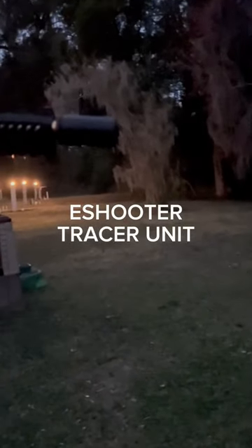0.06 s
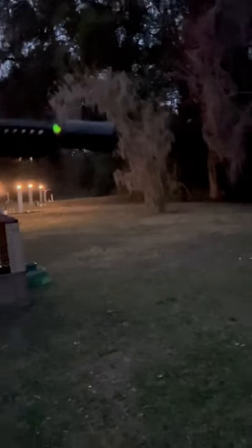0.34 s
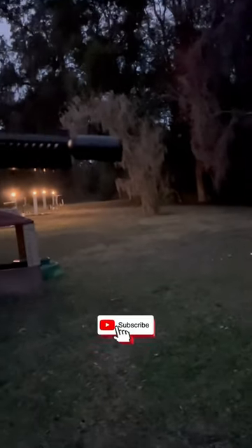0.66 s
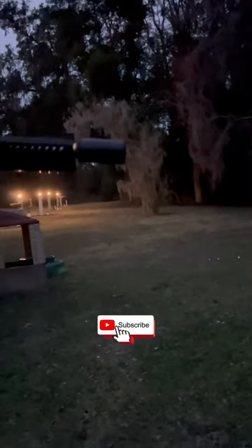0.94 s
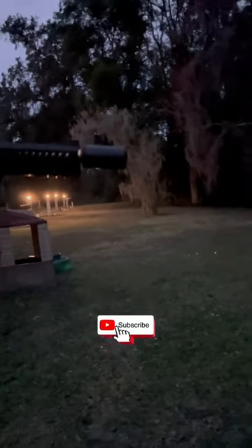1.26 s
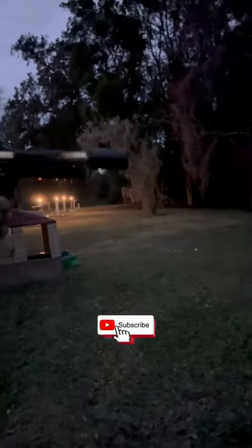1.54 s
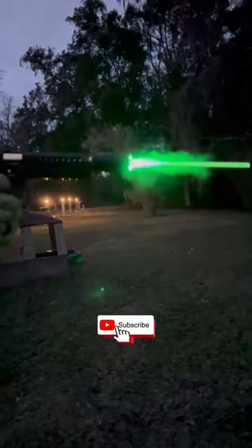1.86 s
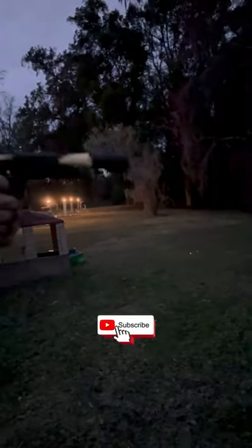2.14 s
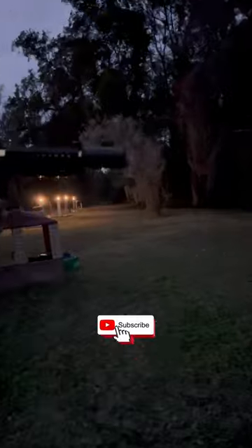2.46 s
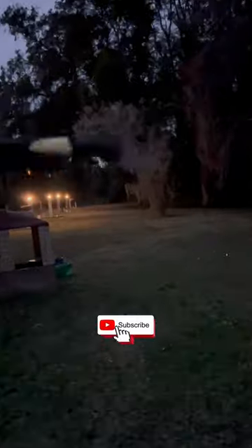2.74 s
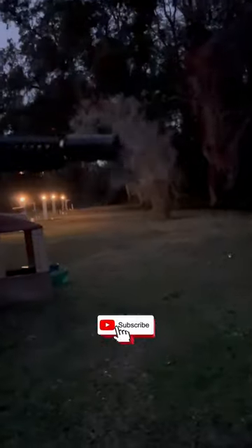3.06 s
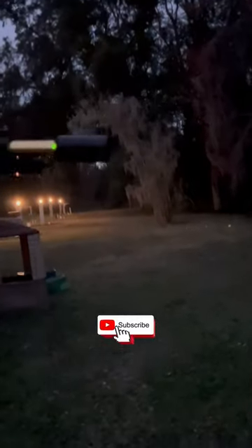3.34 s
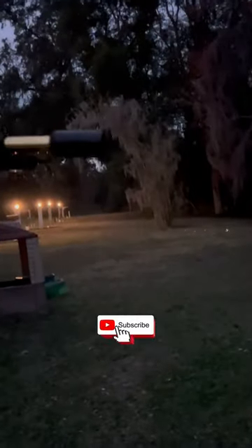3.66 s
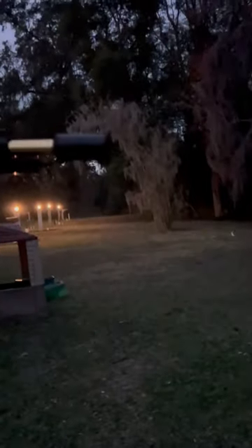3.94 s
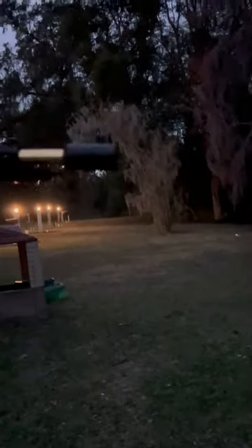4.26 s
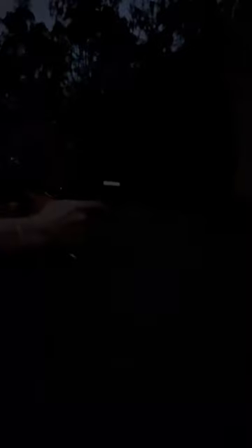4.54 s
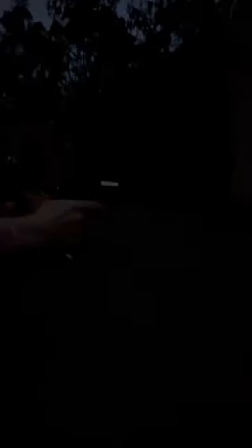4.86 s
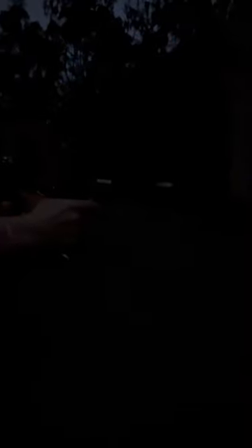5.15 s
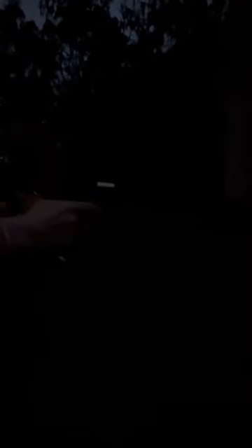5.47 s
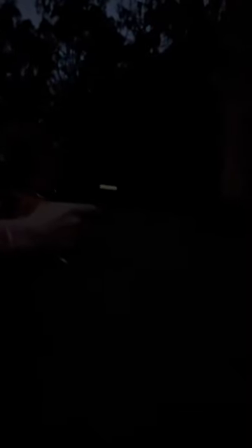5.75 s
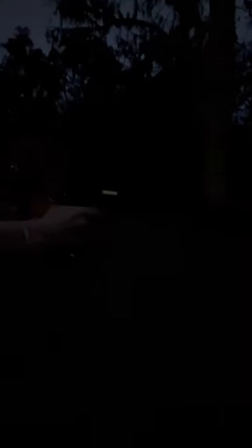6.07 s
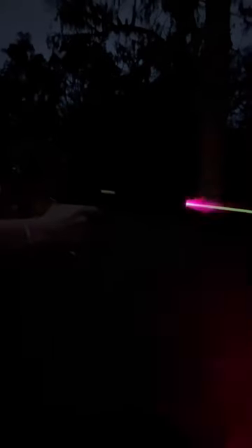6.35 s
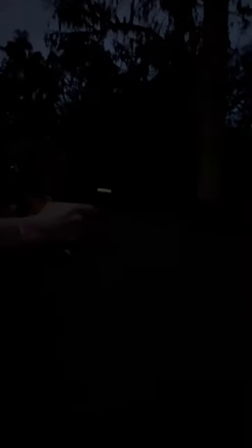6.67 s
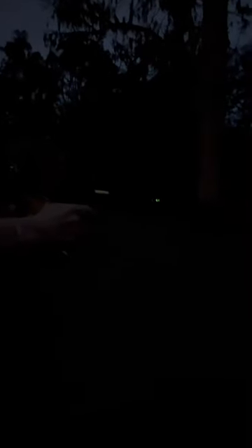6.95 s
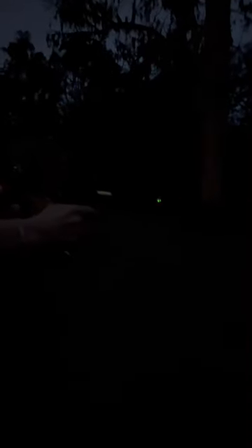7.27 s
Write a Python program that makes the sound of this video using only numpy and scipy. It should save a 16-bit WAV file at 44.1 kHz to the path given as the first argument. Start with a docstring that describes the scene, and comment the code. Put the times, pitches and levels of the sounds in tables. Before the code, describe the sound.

Outdoors, a close airsoft pistol cracks once, then fires ten quick shots, its slide snapping and rattling with each puff of gas. Two faint, dull knocks sound far off in the pause. A low, airy rush rises twice, with one shot between the swells, and three evenly spaced shots follow. Light trigger clicks, a short echo from trees and a faint pellet strike on a far target sit over a quiet background hum.

```python
"""Airsoft pistol on a lawn at dusk

A gas blowback pistol fires close to a stereo microphone: single shots and one fast string. Each shot is
a cycle: hammer, gas pop, slide at its rear stop, slide slamming shut, rebound. Trees scatter the cracks
back and pellets ring a distant target. Behind lie a faint insect and a low rush that swells twice."""
import sys
import numpy as np
from scipy import signal
from scipy.fft import rfft, irfft, next_fast_len
from scipy.io import wavfile
from scipy.ndimage import map_coordinates

SR = 44100
rng = np.random.default_rng(int(sys.argv[2]) if len(sys.argv) > 2 else 0)


def digitize_waveform(pressure):
    """Quantize a signal to 16-bit integers and store it at the path in sys.argv[1].

    Rows of a 2-D input are taken as channels; values are limited to [-1, 1].
    """
    field = np.atleast_2d(pressure).T
    bounded = np.clip(field, -1, 1)
    quanta = np.round(bounded * 32767).astype(np.int16)
    wavfile.write(sys.argv[1], SR, quanta)


N = 331191
T = np.arange(SR // 3) / SR  # seconds within one event

# Each row: hammer fall in seconds, seconds until the slide is shut, relative levels in dB of gas charge,
# thump, barrel ring and sear scrape, then 1 if the slide locks open on the empty magazine.
SHOT_CYCLES = [(0.2135, 0.063, 0.5, -26, -27, -24, 0), (1.269, 0.059, 0, -23.5, -29.5, -19, 0),
               (1.4706, 0.067, -0.16, -23.5, -31.5, -23, 0), (1.6718, 0.066, -2, -32.5, -30.5, -26.5, 0),
               (1.8783, 0.067, 0.86, -30.5, -36.5, -25.5, 0), (2.0764, 0.067, -0.5, -33, -35.5, -22, 0),
               (2.2743, 0.071, .5, -22.5, -37.5, -25, 0), (2.4909, 0.069, 1.35, -18, -38, -26, 0),
               (2.704, 0.07, 1.5, -33, -38.5, -28.5, 0), (2.9029, .0699, 0, -21.5, -40.5, -22.5, 0),
               (3.1224, 0.064, -1.5, -41, -46, -23.5, 1), (5.0462, 0.066, -4, -35.5, -36, -16.5, 0),
               (6.3081, 0.066, -3.5, -31.5, -39.5, -15, 0), (6.6871, 0.064, -2.5, -28.5, -39, -22.5, 0),
               (7.0638, 0.061, -2.5, -31.5, -37, -20.5, 0)]
# Trigger and handling ticks, then far knocks. Each row: start in seconds, relative level in dB.
HANDLING_TICKS = [(0.365, -34), (1.235, -56), (2.6046, -34), (3.3121, -50.5), (4.3297, -66),
                  (4.4963, -58.5), (4.9551, -57), (5.1903, -35), (6.471, -33.5), (6.8385, -34.5),
                  (7.207, -34.5)]
FAR_KNOCKS = [(3.743, -45.5), (4.048, -51.5)]
# Hits on the target. Each row: start in seconds, splash level in dB, ring level in dB.
PELLET_HITS = [(1.555, -44, -46), (7.35, -39.5, -42.5)]
# The insect's calls. Each row: start in seconds, length in seconds, level in dB.
INSECT_TRILLS = [(0.037, 0.19, -79), (0.67, 0.14, -78), (3.736, 0.12, -82), (4.222, 0.22, -87.5),
                 (4.53, .3, -76.5), (5.73, 0.13, -74)]
# The breeze over the lawn. Each row: time in seconds, relative strength in dB.
BREEZE_STRENGTH = [(0, 2.5), (1.1, -0.5), (3.05, -6), (3.399, -15.5), (4.15, -10.5), (4.45, -3), (7.5, -2)]
# Louder spells of background. Each row: start, end and rise in seconds, rumble and rush lifts in dB.
SWELLS = [(4.505, 5.05, 0.0043, 20, 23), (5.187, 6.315, 0.15, 19.5, 19)]

# Broad spectra of the pistol's sounds. Each row: frequency in Hz, relative level in dB.
HAMMER_SPECTRUM = [(100, -32.5), (600, -2), (1300, -4.5), (2200, 0), (3400, -11.5), (5500, 0), (10000, 0),
                   (12000, -12.5), (15500, -13.5), (17000, -30)]
VENT_SPECTRUM = [(100, -18.5), (700, -4.5), (1400, -8), (1800, -2), (3400, -6.5), (5000, -1), (9500, -1.5),
                 (12000, -16.5), (15500, -15), (17000, -44.5)]
POP_SPECTRUM = [(40, -22.5), (150, 2.5), (260, -1), (370, -6), (600, -5.5), (780, -12), (980, -9.5),
                (1400, -20.5), (2500, -19.5), (6000, -58.5)]
THUMP_SPECTRUM = [(15, -23), (40, 3), (70, 5.5), (130, 3.5), (230, -2.5), (600, -54.5)]
DRAUGHT_SPECTRUM = [(18, -33.5), (33, -16.5), (50, 5), (85, -5.5), (130, -18), (300, -25.5), (900, -52)]
SLAM_SPECTRUM = [(100, -28.5), (520, -26), (850, -9), (1300, -13.5), (1850, -10.5), (2500, -0.5),
                 (3300, -4), (5000, -0.5), (10000, 1.5), (12000, -8.5), (15500, -13.5), (17000, -32.5)]
SLIDE_RING_SPECTRUM = [(200, -44.5), (1200, -18), (2000, 0), (2900, -1), (3800, -14.5), (8000, -35)]
LOOSE_SPECTRUM = [(100, -44.5), (550, -25.5), (850, -16.5), (1300, -13.5), (1900, 0), (3400, -6),
                  (4500, -1), (10000, 0), (12000, -14), (15500, -12.5), (17000, -41.5)]
# Spectra of the sounds farther off. Each row: frequency in Hz, relative level in dB.
KNOCK_SPECTRUM = [(200, -38), (550, 11), (800, 1), (1200, 3), (1700, -5), (2500, -34), (8000, -42)]
RUMBLE_SPECTRUM = [(15, -47.5), (25, -29), (38, -8.5), (59, 0.5), (128, -6.5), (160, -11.5), (204, -13.5),
                   (350, -31), (600, -78)]
RUSH_SPECTRUM = [(150, -28.5), (250, -2.5), (406, -7), (544, -2), (800, -2), (1110, -5), (2300, -17.5),
                 (3500, -28), (4690, -29), (5090, -35.5), (8130, -47), (12000, -71), (15600, -99),
                 (22000, -120)]
HUM_SPECTRUM = [(20, -46), (35, -24.5), (60, -3.5), (100, -6), (130, 6), (165, -8), (324, -16.5),
                (571, -19.5), (1420, -25.5), (2210, -34), (4520, -44.5), (9000, -58.5), (13000, -87)]

# Resonances of breech and hammer, and of the slide as it slams, rings and rattles loose.
# Each row: centre in Hz, width in Hz, dB over the broad spectrum.
BREECH_MODES = [(1820, 160, 1), (2860, 540, 6.5), (4020, 730, 4), (5950, 330, -2.5), (7560, 410, -5.5),
                (10400, 230, 0.5)]
SLAM_MODES = [(2420, 270, 1), (2500, 150, 7), (4273, 490, -1), (6350, 420, 3)]
SLIDE_RING_MODES = [(2260, 310, 15), (2650, 320, 13.5), (3050, 300, 10)]
RATTLE_MODES = [(1850, 200, -3), (2250, 260, 1), (2980, 300, 0.5), (4540, 440, -2.5)]

# Echoes from the ground and the trees. Each row: frequency in Hz, seconds to fall 60 dB.
GROUND_DECAY = [(100, 0.073), (1000, 0.065), (6000, 0.089), (14000, 0.029)]
TREE_DECAY = [(100, .3), (700, 0.64), (2500, .95), (6000, 1.0), (10000, 0.72), (13000, 0.25)]
# Balance at the microphone. Each row: frequency in Hz, left minus right in dB.
PISTOL_BALANCE = [(60, 0), (200, -1.8), (380, -1.2), (700, -2), (1290, 1.6), (2380, 1.5), (4400, -0.5),
                  (15000, 0)]
BREEZE_BALANCE = [(60, -0.5), (600, -7), (3000, 3.0)]
# Phase at the microphone. Each row: frequency in Hz, radians by which left leads.
PISTOL_LEAD = [(60, .1), (300, .2), (650, .55), (1500, 0), (2500, .15), (4500, -.1), (6550, -.6),
               (15000, -1.1)]
BREEZE_LEAD = [(80, 0), (300, -0.024), (650, -1.0), (3000, -1.0)]

GAS_SHARE, REAR_SHARE = .178, .297  # shares of the cycle until gas leaves and the slide hits its stop


def muzzle(ring_hz=775, pitch_rise=0.13, ring_t60=0.15, pop_db=11.5, crack_db=-14.5):
    """Gas leaves as one pressure pulse with a turbulent crack; the barrel rings and a draught follows."""
    puffs = [(s + GAS_SHARE * cycle, gas_db, thump_db, ring_db)
             for s, cycle, gas_db, thump_db, ring_db, *_ in SHOT_CYCLES]
    pop, thump = body(POP_SPECTRUM), body(THUMP_SPECTRUM)
    # the barrel's pitch climbs as air replaces the heavier gas
    pitch = ring_hz * (1 - pitch_rise * np.exp(-T / 0.049))
    ring = amp(-60 * T / ring_t60) * np.sin(2 * np.pi * np.cumsum(pitch) / SR)
    pulse = place((s + .0008, amp(pop_db + gas_db) * pop + amp(thump_db + 33.5) * thump)
                  for s, gas_db, thump_db, _ in puffs)
    barrel = place((s, amp(db + 1) * ring) for s, *_, db in puffs)
    crack = place((s, amp(crack_db + db) * burst(.00024, .0038, .026, apart=.98)) for s, db, *_ in puffs)
    draught = place((s + .061, amp(db - 21.5) * burst(.03, .13, .3, apart=.02)) for s, _, db, _ in puffs)
    crack = through(crack, body(VENT_SPECTRUM, BREECH_MODES))
    return pulse + barrel + crack + through(draught, body(DRAUGHT_SPECTRUM))


def hammer(level_db=-11.5):
    """The trigger drags, the sear scrapes free, the hammer cracks on the valve and knocks the frame."""
    falls = [(s, scrape_db) for s, *_, scrape_db, _ in SHOT_CYCLES]
    swell = np.exp(-np.abs(T - .016) / 0.004)
    drag = place((s - .019, amp(db - 10) * swell * noise(0.27)) for s, db in falls)
    scrape = place((s - .0038, amp(db - 2) * burst(.00037, .0047, .0046)) for s, db in falls)
    # driven by a spring, the hammer always strikes equally hard
    crack = place((s, amp(level_db) * burst(.00027, .0022, .011, apart=.57)) for s, _ in falls)
    chatter = place((s, amp(level_db - 21) * burst(.0016, .0069, .025, apart=.3)) for s, _ in falls)
    knock = place((s + .00084, amp(level_db + 7) * body(POP_SPECTRUM)) for s, _ in falls)
    steel = gritty(drag, depth_db=7) + scrape + crack + chatter
    return through(steel, body(HAMMER_SPECTRUM, BREECH_MODES)) + knock


def blowback(level_db=-16):
    """The slide hits its rear stop; spent gas hisses out of the breech while the parts rattle."""
    stops = [(s + REAR_SHARE * cycle, level_db + gas_db) for s, cycle, gas_db, *_ in SHOT_CYCLES]
    clack = place((s, amp(db) * burst(.0008, .0039, .023, apart=.36)) for s, db in stops)
    hiss = place((s, amp(db - 19.5) * burst(.0036, .026, .18, apart=.13)) for s, db in stops)
    knock = place((s + .002, amp(db + 10) * body(POP_SPECTRUM)) for s, db in stops)
    breech = gritty(clack, depth_db=2, rate=440) + gritty(hiss, depth_db=3, rate=250)
    return through(breech, body(VENT_SPECTRUM, BREECH_MODES)) + knock


def slide_return(slam_db=-10, rebound_db=-16.5, rebound_s=.0163, catch_s=.0095):
    """A spring drags the slide along its rails to slam and rebound; when empty it only hits its catch."""
    slams, rebounds = [], []
    for s, cycle, gas_db, *_, locks_open in SHOT_CYCLES:
        force_db = 0.53 * gas_db  # more gas, harder return
        if locks_open:
            rebounds.append((s + REAR_SHARE * cycle + catch_s, rebound_db + force_db))
        else:
            slams.append((s + cycle, slam_db + force_db))
            rebounds.append((s + cycle + rebound_s, rebound_db + force_db))
    rails = place((s - .011, amp(db - 17) * burst(.003, .0064, .0091, apart=.25)) for s, db in slams)
    slam = place((s, amp(db) * burst(.00021, .00088, .011, apart=.09)) for s, db in slams)
    rattle = place((s, amp(db - 15.5) * burst(.002, .0035, .009, apart=.32)) for s, db in slams)
    rebound = place((s - .002, amp(db) * burst(.005, .0042, .013, apart=.063)) for s, db in rebounds)
    loose = gritty(rails + rattle, depth_db=2, rate=440) + gritty(rebound, depth_db=2.5, rate=2400)
    ring = place((s, amp(db - 6.5) * burst(.00039, .0018, .012)) for s, db in slams)
    return (through(slam, body(SLAM_SPECTRUM, SLAM_MODES))
            + through(ring, body(SLIDE_RING_SPECTRUM, SLIDE_RING_MODES))
            + through(loose, body(LOOSE_SPECTRUM, RATTLE_MODES)))


def jiggle(count=6, span_s=0.13, level_db=-29, spread_db=4, settle_db_per_s=170):
    """Slide and magazine tick at random while the pistol recoils and settles."""
    ticks = []
    for s, cycle, *_ in SHOT_CYCLES:
        for late in span_s * rng.random(count):
            db = level_db - settle_db_per_s * late + spread_db * rng.standard_normal()
            ticks.append((s + REAR_SHARE * cycle + late, amp(db) * burst(.00033, .00062, .008, apart=.2)))
    return through(place(ticks), body(LOOSE_SPECTRUM, RATTLE_MODES))


def handling():
    """Trigger and loose parts tick in the hand, close to the microphone."""
    ticks = place((s, amp(db) * burst(.00045, .0015, .024)) for s, db in HANDLING_TICKS)
    return through(ticks, body(LOOSE_SPECTRUM, RATTLE_MODES))


def scatter(x, decay, build_s, apart):
    """Diffuse echo off ground or trees, new for each shot; each frequency dies at its own speed."""
    hz, t, frames = signal.stft(noise(apart, size=SR), SR, nperseg=256)
    fade = amp(-60 * t / along(decay, hz)[:, None]) * (1 - np.exp(-t / build_s))
    edges = [round((s - .03) * SR) for s, *_ in SHOT_CYCLES] + [N]
    echoes = []
    for start, end in zip(edges, edges[1:]):
        shifted = np.roll(frames, rng.integers(len(t)), axis=-1)
        _, tail = signal.istft(shifted * fade, SR, nperseg=256)
        echo = signal.fftconvolve(x[:, start:end], tail / np.linalg.norm(tail[0]), axes=1)
        echoes.append((start / SR, echo[:, :N - start]))
    return place(echoes)


def target(ring_hz=393, t60=0.22):
    """Pellets strike far across the lawn: a bright splash and one hollow ring."""
    splash = place((s, amp(db) * burst(.00098, .014, .37, apart=.94)) for s, db, _ in PELLET_HITS)
    tone = np.sin(2 * np.pi * ring_hz * T)
    ring = place((s, amp(db - 60 * T / t60) * tone) for s, _, db in PELLET_HITS)
    return through(splash, body(VENT_SPECTRUM)) + ring


def far_knocks():
    """Soft, dull knocks in the distance."""
    knocks = place((s, amp(db - 3.5) * burst(.0019, .0054, .025)) for s, db in FAR_KNOCKS)
    return through(knocks, body(KNOCK_SPECTRUM))


def insect(pitches_hz=(4600, 4745, 4880), pips_per_s=11, waver_hz=14):
    """Faint trills of a few short pips on three close pitches."""
    t = np.arange(N) / SR
    trills = place((s, amp(db) * np.clip(np.minimum(T, length - T) / .015, 0, 1))
                   for s, length, db in INSECT_TRILLS)
    song = 0
    for hz in pitches_hz:
        level = amp(2.2 * wobble(4))
        pips = np.sin(np.pi * (pips_per_s * t + rng.random())) ** 4
        tone = np.sin(2 * np.pi * np.cumsum(hz + waver_hz * wobble(90)) / SR)
        song += level * pips * tone
    return trills * unit(song)


def breeze(rumble_lift_db, rush_lift_db):
    """One breeze drives a rumble and a rush, to the right of the microphone."""
    breeze_db = np.interp(np.arange(N) / SR, *np.transpose(BREEZE_STRENGTH))
    rumble_db = -51 + 1.25 * breeze_db + rumble_lift_db + 1.1 * wobble(7.5)
    rumble = amp(rumble_db) * bed(RUMBLE_SPECTRUM, apart=.02)
    rush = amp(-60 + breeze_db + rush_lift_db) * bed(RUSH_SPECTRUM, apart=.5)
    return at_microphone(rumble + rush, BREEZE_BALANCE, BREEZE_LEAD)


def swell_lifts(sag_per_s=0.19, fall_s=0.077):
    """Lifts of rumble and rush in dB: each swell rises, sags slowly and drops away."""
    t = np.arange(N) / SR
    rumble_db = rush_db = 0
    for start, end, rise, low_db, high_db in SWELLS:
        gate = np.clip(np.minimum((t - start) / rise, 1 - (t - end) / fall_s), 0, 1)
        shape = gate * (1 - sag_per_s * (t - start))
        rumble_db += low_db * shape
        rush_db += high_db * shape
    return rumble_db, rush_db


def far_hum():
    """A steady low hum of noise, far behind everything."""
    return amp(-57.5) * bed(HUM_SPECTRUM, apart=.023)


def amp(db):
    """Decibels to gain."""
    return 10 ** (np.asarray(db) / 20)


def unit(x):
    """Scale to rms 1."""
    return x / np.sqrt(np.mean(x ** 2) + 1e-20)


def along(points, hz):
    """Read (Hz, value) points on a log axis."""
    f, v = np.transpose(points)
    return np.interp(np.log(hz + 1), np.log(f + 1), v)


def filtered(x, response):
    """Filter x by a complex response of frequency."""
    size = next_fast_len(N + SR // 2, True)
    return irfft(rfft(x, size) * response(np.fft.rfftfreq(size, 1 / SR)), size)[..., :N]


def body(spectrum, modes=(), size=8192):
    """Causal impulse response of energy 1: a broad spectrum with resonances on top."""
    hz = np.fft.rfftfreq(size, 1 / SR)
    peaks = sum(amp(db) ** 2 / (1 + (2 * (hz - centre) / width) ** 2) for centre, width, db in modes)
    cepstrum = irfft(np.log(amp(along(spectrum, hz)) * np.sqrt(1 + peaks)))
    cepstrum[1:size // 2] *= 2  # fold to minimum phase
    cepstrum[size // 2:] = 0
    response = irfft(np.exp(rfft(cepstrum)))
    return response / np.linalg.norm(response)


def through(x, response):
    """Convolve both channels."""
    return signal.oaconvolve(x, np.atleast_2d(response), axes=1)[:, :N]


def noise(apart, size=len(T)):
    """White stereo noise; apart is the share of power that each channel has alone."""
    shared = np.sqrt(1 - apart) * rng.standard_normal(size)
    return shared + np.sqrt(apart) * rng.standard_normal((2, size))


def bed(spectrum, apart):
    """Steady stereo noise of rms 1 with the given spectrum."""
    return unit(filtered(noise(apart, size=N), lambda hz: amp(along(spectrum, hz))))


def burst(rise, hold, t60, apart=0.085):
    """Noise that swells, holds and dies away (times in seconds)."""
    return noise(apart) * np.minimum(T / rise, 1) * amp(-60 * np.maximum(T - hold, 0) / t60)


def wobble(rate):
    """A smooth random curve, rate knots a second."""
    knots = rng.standard_normal(int(N * rate / SR) + 4)
    return map_coordinates(knots, [np.arange(N) * rate / SR], order=2)


def gritty(x, depth_db, rate=450):
    """Metal parts catch and slip: the level jumps about rate times a second."""
    return x * unit(amp(depth_db * wobble(rate)))


def place(events):
    """Sum (seconds, sound) pairs on a stereo track."""
    track = np.zeros((2, N + SR))
    for s, sound in events:
        track[:, max(round(s * SR), 0):][:, :sound.shape[-1]] += sound
    return track[:, :N]


def at_microphone(x, balance, lead):
    """Level and phase differences between the two microphone ports."""
    sides = np.array([[.5], [-.5]])
    return filtered(x, lambda hz: amp(sides * along(balance, hz)) * np.exp(1j * sides * along(lead, hz)))


def scene():
    """The pistol up close, its scatter off the ground, the blast's echo from the trees, and the garden."""
    blast = hammer() + muzzle() + blowback()
    pistol = blast + slide_return() + handling() + jiggle()
    rumble_lift_db, rush_lift_db = swell_lifts()
    ground = amp(-19) * scatter(pistol, GROUND_DECAY, build_s=.0074, apart=.26)
    # the far echo swells with the rush
    trees = amp(-33 + 0.73 * rush_lift_db) * scatter(blast, TREE_DECAY, build_s=.04, apart=.35)
    close = at_microphone(pistol + ground, PISTOL_BALANCE, PISTOL_LEAD)
    distant = trees + target() + far_knocks()
    return close + distant + insect() + breeze(rumble_lift_db, rush_lift_db) + far_hum()


def record(dry, bass_delay_s=.0075, corner_hz=262, ceiling=0.72, top_hz=16100):
    """The microphone delays the bass, so pops chirp downwards; peaks are rounded and the top is cut."""
    x = filtered(dry, lambda hz: np.exp(-2j * np.pi * bass_delay_s * corner_hz * np.arctan(hz / corner_hz)))
    rounded = x / (1 + (x / ceiling) ** 4) ** (1 / 4)
    return filtered(rounded, lambda hz: 1 / np.sqrt(1 + (hz / top_hz) ** 160))


dry = scene()
out = record(dry)
digitize_waveform(out)
```